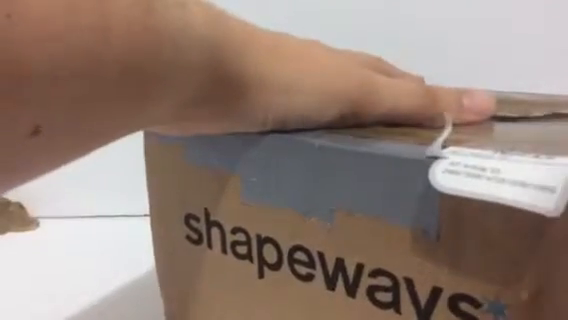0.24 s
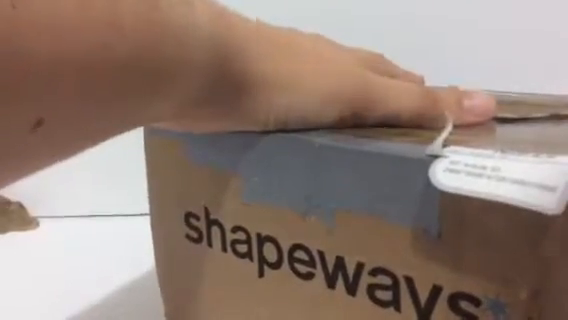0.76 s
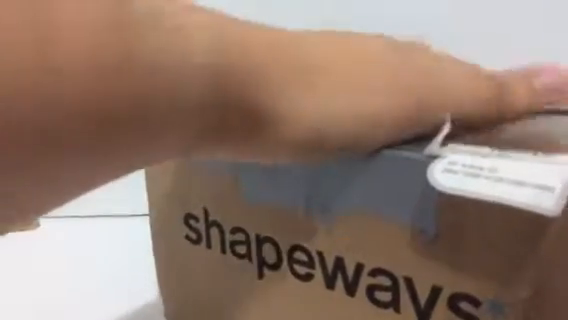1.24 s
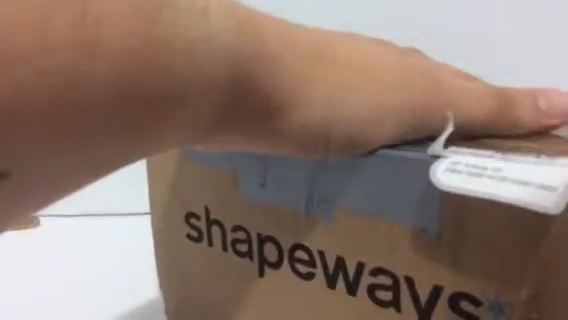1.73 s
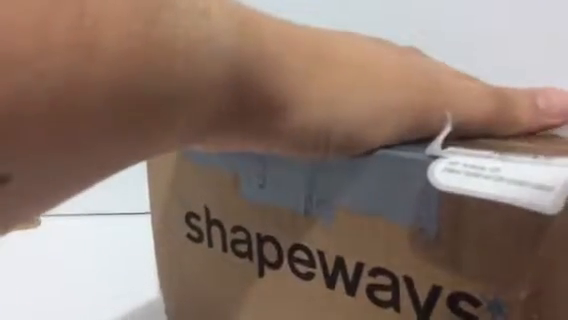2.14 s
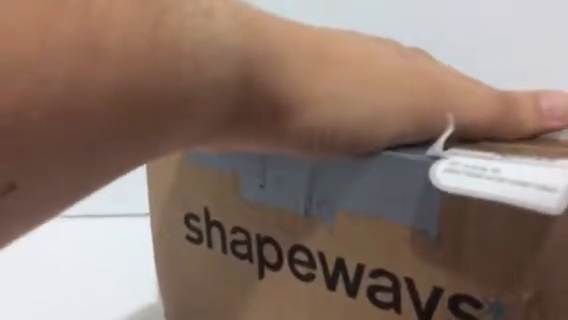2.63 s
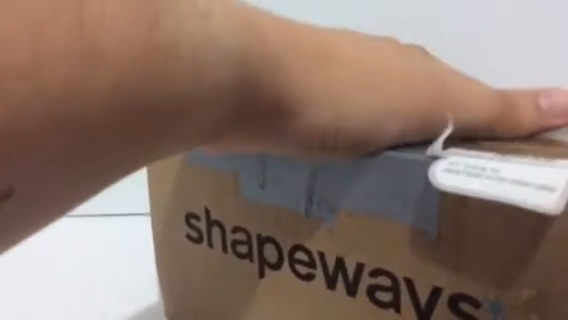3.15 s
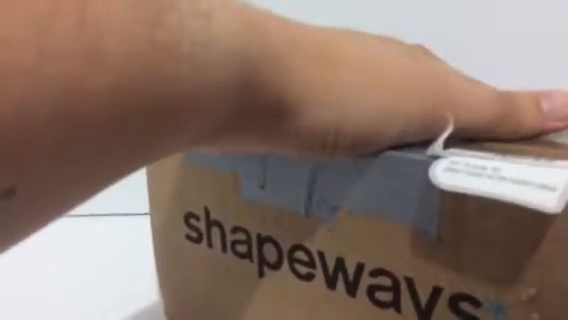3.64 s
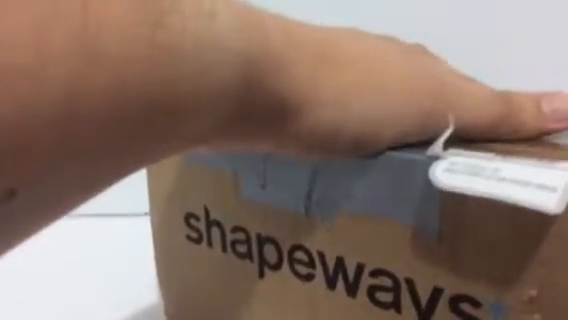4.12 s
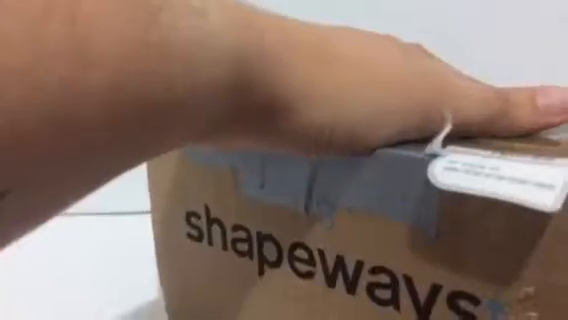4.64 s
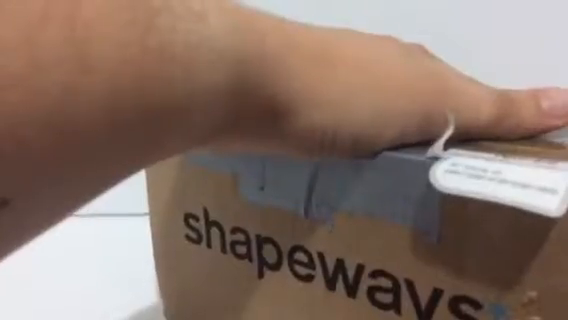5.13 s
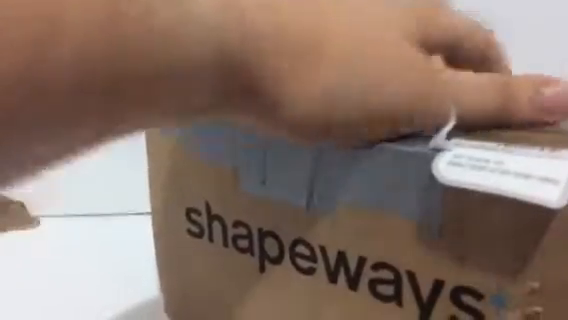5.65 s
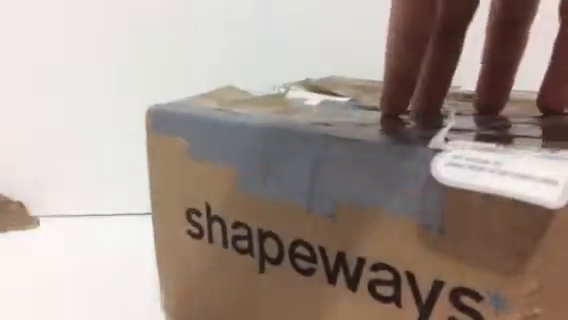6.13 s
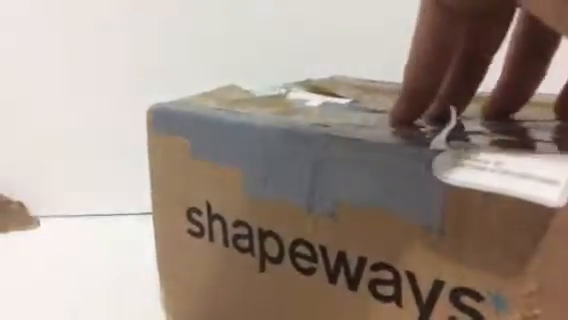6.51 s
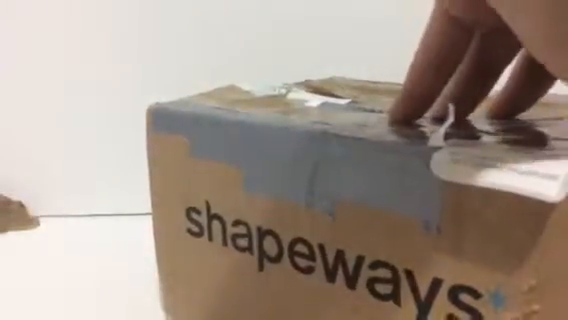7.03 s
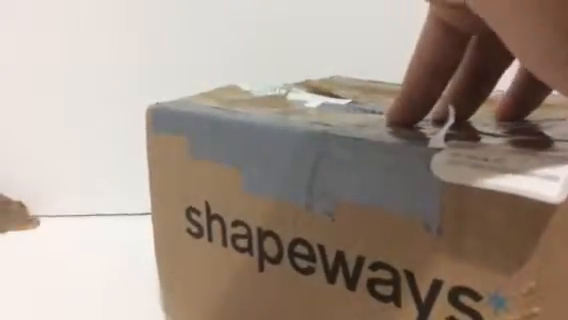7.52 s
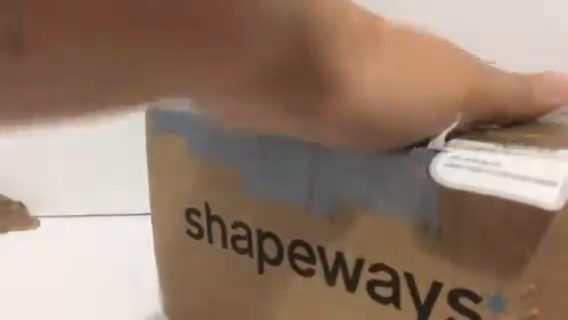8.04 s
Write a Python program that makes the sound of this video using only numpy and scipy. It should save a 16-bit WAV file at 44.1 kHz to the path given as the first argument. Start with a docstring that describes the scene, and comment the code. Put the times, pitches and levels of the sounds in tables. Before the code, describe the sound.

A hand scrapes to and fro over tape on a hollow cardboard box, with hissing rasps, sharp crackles and dull knocks.

```python
"""A hand holds a cardboard box in a small quiet room. At first fingers knock the card and the tape on the
lid cracks and squeaks. For over five seconds the tape is scraped to and fro: each stroke is a dense rain
of tiny slips that hiss off the tape and ring the hollow box. Then the tape is picked at and torn, with
more cracks and knocks. Just before the end a small metal part pings twice."""
import sys
import numpy as np
from scipy import signal
from scipy.fft import rfft, irfft, next_fast_len
from scipy.io import wavfile
from scipy.ndimage import uniform_filter1d

SR = 44100
rng = np.random.default_rng(int(sys.argv[2]) if len(sys.argv) > 2 else 0)


def dump(signal):
    """Clip the signal to [-1, 1] and save it as 16-bit WAV at the path in sys.argv[1]."""
    limited = np.clip(np.atleast_2d(signal).T, -1, 1)
    pcm = np.round(limited * 32767).astype(np.int16)
    wavfile.write(sys.argv[1], SR, pcm)


N = 364971

# Strokes of the hand. Each row: start in seconds, length in seconds, where it is fastest (0 to 1),
# hiss level in dB, then box boom, lid ring and papery rasp, each in dB above the hiss.
STROKES = [(-0.035, 0.2, 0.37, -56, 12, 3.5, -3.0), (0.073, 0.22, 0.68, -55, -0.5, -3, -4.5),
           (0.225, 0.28, 0.44, -56.5, 2.5, -2.5, 0), (0.415, 0.21, 0.67, -59, 3.5, 3, 0),
           (0.549, 0.25, 0.53, -54.5, 1.5, -1.0, 0), (0.738, 0.26, 0.75, -54.5, -2, -18, -3.5),
           (0.903, 0.3, 0.32, -62, -2, -3, -5.0), (1.13, 0.36, 0.49, -68, 8.5, 2.0, -2.5),
           (1.359, 0.2, 0.84, -55, -0.5, 3.5, -5.0), (1.52, 0.26, 0.53, -54, 4, 6, -7.5),
           (1.729, 0.23, 0.54, -58.5, 2.5, 1.5, -9.5), (1.929, 0.17, 0.58, -52.5, 2, 2.5, -11),
           (2.041, 0.3, 0.69, -52.5, 0, 1.5, -6), (2.303, 0.24, 0.52, -46, 1.0, 1, -11.5),
           (2.476, 0.23, 0.61, -57, 5.5, 3.5, -6), (2.626, 0.27, 0.65, -54.5, 2.5, 5, -14),
           (2.832, 0.36, 0.71, -52.5, 3, 5.5, -8.5), (3.145, 0.27, 0.47, -44, -1.5, 3.5, -7.5),
           (3.37, 0.25, 0.68, -46, -2.5, -4.5, -8.5), (3.548, 0.29, 0.43, -46.5, -4.5, 1.5, -6),
           (3.782, 0.23, 0.58, -49, -4.0, -4, -5.5), (3.947, 0.32, 0.48, -46, -4.5, 0.0, -5.5),
           (4.205, 0.27, 0.6, -46.5, -5, -0.5, -6), (4.378, 0.3, 0.56, -43.5, -7, 1.5, -7.5),
           (4.624, 0.28, 0.42, -50.5, -3.5, -2, -6.5), (4.858, 0.208, 0.34, -51.5, -3.5, -0.5, -9.5),
           (5.051, 0.18, 0.56, -52.5, -3.0, -3.5, -12.5), (5.166, 0.21, 0.57, -54.5, -3.5, -1, -10.5),
           (5.317, 0.2, 0.52, -64.5, 4.5, -3.5, -9.5), (5.461, 0.12, 0.32, -64.5, 13.5, 13.5, -3),
           (5.528, 0.21, 0.12, -55, -4.5, 1.5, 3.5), (5.6, 0.37, 0.26, -62, -3, -3.5, -4.5),
           (5.922, 0.12, 0.04, -59.5, -35, -30, -14), (6.001, 0.13, 0.22, -67.5, -17, -27, -12),
           (6.138, 0.33, 0.17, -64.5, -23, 4.0, 6.5), (6.281, 0.41, 0.09, -56.5, -13, -11.5, -6),
           (6.453, 0.24, 0.35, -58.5, -10, -7, -6), (6.569, 0.17, 0.22, -54.5, -8.5, -20, -14),
           (6.64, 0.14, 0.62, -57, -8, -9, -8.0), (6.74, 0.14, 0.24, -71, -4, -11, -7),
           (6.878, 0.1, 0.26, -74, -23.0, -21.0, -11), (7.013, 0.15, 0.31, -70, 4, 1.5, -3.0),
           (7.193, 0.12, 0.53, -61.5, 6, -5, -17.5), (7.34, 0.13, 0.6, -74, 10.5, 2, -4),
           (7.429, 0.15, 0.14, -59, -2, 0, -0.5), (7.503, 0.41, 0.46, -67, 13.5, 4, -2.5),
           (7.76, 0.31, 0.5, -68.5, 6.5, -1, -10), (7.946, 0.16, 0.37, -68, -2.5, -17, -12),
           (8.106, 0.24, 0.1, -62.5, 4, -4, -3), (8.118, 0.27, 0.73, -50, 3.5, 1, -9)]
# The tones (modes) of the hollow box and of its lid.
# Each row: pitch in Hz, relative level in dB, seconds to fade by 60 dB.
BOX_MODES = [(115, -4.5, 0.078), (155.5, 1.5, 0.038), (232, -2, 0.021), (243.5, 6.5, 0.032),
             (350.4, 6, 0.03), (405, -2, 0.035), (515, 4, 0.028)]
LID_MODES = [(686, -12, 0.1), (830, 3.5, 0.026), (950, 9, 0.014), (1027, 6.5, 0.02), (1300, 0, 0.013),
             (1476, 4, 0.011), (1680, 6, 0.0085), (1887, 0, 0.016), (2190, -6.5, 0.01)]
HISS_POWER, BOOM_POWER, RING_POWER = 3.1, 2.13, 3.18  # loudness grows with hand speed to these powers


def gain(db):
    """Turn decibels into a factor to multiply by."""
    return 10 ** (np.asarray(db) / 20)


def unit(x):
    """Scale a signal to an average (rms) level of 1."""
    return x / np.sqrt(np.mean(x ** 2))


def colour(x, points):
    """Shape low and high pitches along (Hz, dB) points; the result has level 1."""
    hz, db = np.transpose(points)
    size = next_fast_len(len(x))
    bin_hz = np.maximum(np.arange(size // 2 + 1) * SR / size, 1)
    curve = gain(np.interp(np.log(bin_hz), np.log(hz), db))
    return unit(irfft(rfft(x, size) * curve, size)[:len(x)])


def wander(per_s):
    """Glide to a new random value, roughly within -1 to 1, per_s times a second."""
    step = int(SR / per_s)
    return uniform_filter1d(np.repeat(rng.standard_normal(N // step + 1), step), step)[:N]


def ring(x, hz, fade_s):
    """One mode: every push in x starts a tone that dies away."""
    decay, angle = np.exp(-np.log(1000) / (fade_s * SR)), 2 * np.pi * hz / SR
    return signal.lfilter([0, decay * np.sin(angle)], [1, -2 * decay * np.cos(angle), decay ** 2], x)


def filtered(x, order, hz, kind):
    """Keep the "high" pitches or one "band" of them."""
    return signal.sosfilt(signal.butter(order, hz, kind, fs=SR, output="sos"), x)


def add(out, start, x):
    """Mix x into out from start, in seconds."""
    i = max(int(start * SR), 0)
    out[i:i + len(x)] += x[:N - i]


def struck(push, modes, scatter_db):
    """One blow: each mode gets a random share and swings against its neighbours; the peak is 1."""
    share_db = scatter_db * rng.standard_normal(len(modes))
    x = sum((-1) ** k * gain(db + share_db[k]) * ring(push, hz, fade_s)
            for k, (hz, db, fade_s) in enumerate(modes))
    return x / np.abs(x).max()


def rubbed(force, level_db, modes, wander_db):
    """The contact moves over the lid, so each mode feels the slips now more, now less."""
    out = np.zeros(N)
    for hz, db, fade_s in modes:
        push = force * rng.choice([-1., 1.], N)
        drift_db = wander_db * (wander(25) + 0.25 * wander(5))
        out += gain(db) * unit(ring(push * gain(level_db + drift_db), hz, fade_s))
    return unit(out) * np.sqrt(np.mean(gain(level_db) ** 2))


def stroke_level(peak_db, speed_power, creep_db=-28):
    """Level in dB over time: each stroke speeds up, then slows; overlapping strokes add up."""
    start, length, fastest = np.array(STROKES).T[:3, :, None]
    fastest = np.clip(fastest, .02, .98)
    t = np.arange(0, N + 64, 64) / SR
    progress = np.clip((t - start) / length, 0, 1)
    speed = np.sin(np.pi / 2 * np.minimum(progress / fastest, (1 - progress) / (1 - fastest)))
    energy = np.sum((gain(peak_db)[:, None] * speed ** speed_power) ** 2, axis=0)
    energy += gain(creep_db) ** 2 * uniform_filter1d(energy, size=200)  # the hand creeps between strokes
    return np.interp(np.arange(N) / SR, t, 10 * np.log10(np.abs(energy) + 1e-11))


def room_air():
    """The still air of the room: a faint, low noise whose level drifts a little."""
    # Each row: pitch in Hz, relative level in dB.
    air_colour = [(13, -50), (22, 0), (76, 8.5), (227, -4), (403, -6.5), (502, -4.5), (608, -8.5),
                  (823, -11), (1310, -12.5), (5770, -14), (9460, -15), (14300, -16), (15500, -22.5)]
    return colour(rng.standard_normal(N), air_colour) * gain(-71.5 + 0.69 * wander(3.19))


def room_echo(x, level_db=-17, fade_s=0.14, dull_hz=6050):
    """Near walls answer after 4 ms with a short tail that gets duller as it fades."""
    t = np.arange(SR // 2) / SR
    noise = rng.standard_normal(len(t))
    dull = signal.lfilter(*signal.butter(1, dull_hz, fs=SR), noise)
    bright = noise * gain(-120 * t / fade_s)
    tail = (dull + bright) * gain(-60 * t / fade_s) * (t > .004)
    return signal.fftconvolve(x, tail / np.sqrt(np.sum(tail ** 2)))[:N] * gain(level_db)


def squeaks():
    """Skin sticks and slips on the tape at a regular rate: a brief, rough, gliding tone."""
    # Each row: start in seconds, first pitch in Hz, last pitch in Hz, level in dB, length in seconds.
    glides = [(0.114, 2490, 2250, -51, 0.018), (0.328, 2326, 2370, -56, 0.028),
              (0.82, 2850, 2750, -55, 0.056), (0.898, 2800, 2780, -54, 0.027),
              (.94, 3300, 3390, -64, 0.037), (0.531, 3420, 3530, -59, 0.047),
              (6.293, 2710, 2600, -52, 0.014), (6.536, 1262, 1060, -49.5, 0.02),
              (6.549, 2005, 1900, -52.5, 0.012)]
    out = np.zeros(N)
    for start, first_hz, last_hz, db, length in glides:
        size = int(length * SR)
        tone = np.sin(2 * np.pi * np.cumsum(np.linspace(first_hz, last_hz, size)) / SR)
        flutter = uniform_filter1d(rng.standard_normal(4096), size=20)[:size] * np.sqrt(20)
        add(out, start, gain(db) * np.hanning(size) * tone * (1 + 0.68 * flutter))
    return out


def metal_pings():
    """A small hard metal part is tapped and rings thin and high."""
    # Each row: start in seconds, pitch in Hz, level in dB, seconds to fade by 60 dB.
    tones = [(8.197, 12100, -39, 0.12), (8.196, 9300, -55, .04), (8.245, 6120, -47, 0.072)]
    out, t = np.zeros(N), np.arange(4096) / SR
    for start, hz, db, fade_s in tones:
        add(out, start, gain(db - 60 * t / fade_s) * np.sin(2 * np.pi * hz * t))
    return out


def knocks():
    """A fingertip pushes the card and rings the box; a longer contact is duller."""
    # Each row: time in seconds (the knock sounds 4.3 ms later), peak level in dB, contact in seconds.
    taps = [(.02, -20.5, 0.002), (.025, -30, 0.0017), (.054, -28, 0.0027), (0.073, -41, .0027),
            (.162, -42, 0.0016), (0.211, -36.5, 0.0029), (0.94, -36.5, 0.0015), (0.995, -43, 0.00043),
            (1.296, -43.5, 0.002), (1.509, -41, 0.0033), (1.647, -30.5, 0.0026), (1.979, -44, 0.0049),
            (2.024, -49, 0.0011), (2.116, -44, 0.0046), (2.242, -33.5, 0.0028), (2.314, -46.5, 0.0058),
            (2.396, -36.5, 0.0032), (2.809, -39, 0.0012), (3.075, -22, 0.0028), (3.226, -37.5, .0023),
            (3.411, -43.5, 0.0039), (3.458, -40, 0.0016), (3.533, -30, 0.0011), (3.656, -41.5, .0023),
            (4.027, -39, 0.0029), (4.336, -33.5, 0.0012), (5.498, -32, 0.00078), (7.031, -49.5, 0.0013),
            (7.245, -44, 0.0015), (7.439, -37.5, 0.0026), (7.572, -33, 0.0031), (7.697, -41, 0.002),
            (7.742, -48, .0018), (7.873, -44, 0.001), (8.239, -38, 0.0027)]
    out, t = np.zeros(N), np.arange(8192) / SR
    for when, db, contact_s in taps:
        push = np.sin(2 * np.pi * np.minimum(t / contact_s, 1))  # the card dents and springs back
        add(out, when + 0.0043, gain(db) * struck(push, BOX_MODES, scatter_db=5.0))
    return out


def tape_cracks(fade_s=0.025, rustle_db=-25, rustle_fade_s=0.15, faint_per_s=15):
    """Glue splits in a burst that snaps and kicks the lid; the film rustles as it settles."""
    # Each row: start in seconds, snap peak in dB, lid ring in dB above the snap, centre pitch in Hz.
    main_cracks = [(0.0228, -39, 5, 2540), (.0538, -30.5, -4, 2060), (0.0612, -31.5, -2, 2470),
                   (0.1897, -43, -16, 8200), (0.219, -41, -13, 3480), (0.2392, -28.5, -23, 2220),
                   (0.2657, -38.5, -25, 2150), (.2967, -39, -23, 2040), (0.3192, -34, -30, 9320),
                   (.3321, -36.5, -26, 2330), (.409, -39, -16, 8300), (0.5817, -24.5, -37, 2240),
                   (0.6347, -32, -31, 2340), (0.6908, -33.5, -11, 2880), (.7652, -52, -15, 6110),
                   (0.8073, -45, -11, 2070), (.841, -40.5, -28, 2900), (0.8876, -25, -45, 10800),
                   (0.8964, -23, -25, 11300), (.9114, -40, -11, 2750), (.925, -43, -8, 2800),
                   (.9443, -34, -7, 3140), (1.0254, -36, -17, 2940), (1.057, -45, -18, 12400),
                   (1.0976, -46, -8, 7640), (1.1997, -42, -18, 2420), (1.254, -41, -12.5, 3380),
                   (1.295, -39.5, -6, 11800), (1.3131, -35.5, -15, 3300), (1.429, -37.5, -20, 3520),
                   (1.491, -31, -25, 13700), (1.4936, -24.5, -18, 14400), (1.5648, -42, -30, 8760),
                   (1.585, -41, -9, 2700), (1.6477, -36.5, 3.5, 3400), (2.0876, -44, -19, 4050),
                   (2.14, -37.5, -29, 3490), (2.3853, -43.5, 5, 7350), (2.708, -43, -27, 6100),
                   (3.052, -33.5, -2, 6460), (3.0824, -27, -1, 6260), (3.118, -37.5, -3, 6850),
                   (3.186, -43, -15, 11700), (3.2181, -32.5, -10, 3740), (3.463, -39, -3, 6580),
                   (3.5228, -29, -6.5, 6400), (3.537, -28.5, -8.5, 9700), (3.6436, -40, -10, 4100),
                   (4.0226, -35, -4, 3970), (4.3853, -32.5, -13, 2700), (5.24, -41, -27, 11900),
                   (5.414, -42.5, -15, 8800), (5.5268, -41.5, 1.5, 2000), (5.5495, -30.5, -10, 3020),
                   (5.6042, -32.5, -30, 10900), (5.7453, -46, -14, 8300), (5.7808, -40.5, -33, 2000),
                   (5.9304, -30, -33, 7060), (5.937, -27.5, -44, 9400), (6.037, -44, -24, 12000),
                   (6.1579, -44, -17, 7700), (6.2115, -42.5, -21, 2030), (6.313, -45, -20, 2530),
                   (6.3472, -41, -0.5, 7840), (6.3669, -35.5, -7.5, 8800), (6.429, -42, -31, 4360),
                   (6.4506, -41, -27, 3650), (6.6004, -42, -34, 10800), (6.6221, -27, -38, 9000),
                   (6.6429, -25.5, -43, 9500), (6.6788, -34, -41, 5620), (6.7173, -37, -21, 5860),
                   (6.785, -49.5, -23, 2600), (6.8808, -37.5, -32, 12700), (6.966, -56, -28, 9100),
                   (7.0458, -47.5, -32, 7360), (7.221, -46, -23, 7150), (7.2499, -44, -8, 5040),
                   (7.442, -21, -5.5, 2440), (7.5778, -40, -5, 5160), (7.8413, -45.5, -0.5, 3060),
                   (7.9044, -49, -13, 11100), (7.938, -48.5, -26, 9600), (8.0096, -38, -19, 12800),
                   (8.1269, -46, -20, 6890), (8.1523, -41, -21, 11200), (8.1968, -26, -26, 11700),
                   (8.244, -38, 5, 5900), (8.2664, -42, -13, 13300)]
    hiss_db = stroke_level(np.array(STROKES)[:, 3], HISS_POWER)
    faint_cracks = []  # these fall by chance and are louder in loud strokes
    for when, rarity, lid_loss, pitch in rng.random((int(faint_per_s * N / SR), 4)):
        db = -33 + 0.35 * hiss_db[int(when * N)] - 1.6 * np.log(rarity)
        faint_cracks.append((when * N / SR, db, -25 * lid_loss, 2000 * 6 ** pitch))
    out, t = np.zeros(N), np.arange(4096) / SR
    rise = np.minimum(t / 0.00071, 1)
    fall = gain(-60 * t / fade_s) + gain(rustle_db - 60 * t / rustle_fade_s)
    first_split = 1 + 1.1 * np.exp(-t / 0.0064)  # the first split is the sharpest
    for start, db, lid_db, hz in main_cracks + faint_cracks:
        burst = rng.standard_normal(len(t)) * rise * fall * first_split
        wide = filtered(burst, 2, 1500 + 0.23 * hz, "high")
        narrow = filtered(burst, 1, [hz * 0.9, min(hz * 1.26, 20000)], "band")
        snap = 1.27 * unit(wide) + unit(narrow)
        lid = gain(lid_db) * struck(burst, LID_MODES, scatter_db=10.0)
        add(out, start, gain(db) * (snap / np.abs(snap).max() + lid))
    return out


def slips(per_s, spread_db, patchy_db):
    """Sticking and slipping makes random clicks that come in patches, a few far larger than the rest."""
    slipped = rng.random(N) < per_s / SR
    size = gain(spread_db * rng.exponential(size=N) + patchy_db * wander(70))
    return unit(slipped * size * rng.standard_normal(N))


def tape_hiss(force, crisp_hz=8000):
    """Slips hiss off the tape; the crackle of thin film, above crisp_hz, swells and sinks."""
    # Each row: pitch in Hz, relative level in dB.
    tape_colour = [(2400, -32), (3400, -3.5), (4400, -2), (5200, -1), (6200, 1), (7200, 0.5), (10600, 0.5),
                   (13100, -1.5), (14700, -5.5), (15500, -0.5)]
    # Each row: time in seconds, lift of the crackle in dB.
    crackle_lift = [(0, -2.5), (.9, 5), (1.5, -1), (2.5, 1.5), (3.5, -0.5), (4.5, -0.5), (5.5, 0),
                    (6.3, 1.5), (7, -1), (8.27, 0.5)]
    hiss = colour(force, tape_colour)
    dull = signal.sosfiltfilt(signal.butter(2, crisp_hz, fs=SR, output="sos"), hiss)
    lift_db = np.interp(np.arange(N) / SR, *np.transpose(crackle_lift))
    return dull + gain(lift_db) * (hiss - dull)


def scraping(surge_db=1.5):
    """Each stroke's slips hiss off the tape and shake its loose flap, the lid and the hollow box."""
    # The modes of the hollows under the palm and of the loose tape flap.
    # Each row: pitch in Hz, relative level in dB, seconds to fade by 60 dB.
    palm_modes = [(3510, -1.5, .009), (4070, 0.5, 0.016), (5170, -3.5, .007), (6120, -0.5, 0.012),
                  (7240, -5, .006)]
    flap_modes = [(2270, 2, 0.0061), (2670, -4, 0.011), (3254, -2.5, 0.0073), (3880, -3, 0.0029),
                  (4560, -8.5, 0.0019)]
    peak_db, boom_db, lid_db, rasp_db = np.array(STROKES)[:, 3:].T
    hiss_db = stroke_level(peak_db, HISS_POWER)
    glue_lumps = uniform_filter1d(np.abs(slips(200, spread_db=0.5, patchy_db=-5.5)), size=60)
    fine_slips = slips(14000, spread_db=1.28, patchy_db=2.17)
    surge = gain(surge_db * wander(18))  # the hand catches and surges within a stroke
    force = unit(fine_slips * surge * (1 + 0.16 * unit(glue_lumps)))
    hiss = tape_hiss(force) * gain(hiss_db)
    whisper = rubbed(force, hiss_db - 9.5, palm_modes, wander_db=6.5)  # shifts as the palm changes shape
    rasp = rubbed(force, stroke_level(peak_db + rasp_db, RING_POWER), flap_modes, wander_db=4.0)
    lid = rubbed(force, stroke_level(peak_db + lid_db, RING_POWER), LID_MODES, wander_db=5.5)
    box_db = stroke_level(peak_db + boom_db, BOOM_POWER, creep_db=-16.5)
    boom = rubbed(force, box_db, BOX_MODES, wander_db=4.0)
    return hiss + whisper + rasp + lid + boom


def scene(lowest_hz=100.7):
    """The box, the still air and the echo of the room, in one channel."""
    box = scraping() + tape_cracks() + knocks() + metal_pings() + squeaks()
    box = filtered(box, 4, lowest_hz, "high")  # a small box sends out little deep bass
    return (box + room_air() + room_echo(box))[None]


def record(dry, top_hz=15400):
    """Cut away the very highest treble."""
    return signal.sosfilt(signal.ellip(10, .2, 65, top_hz, fs=SR, output="sos"), dry)


dry = scene()
out = record(dry)
dump(out)
```